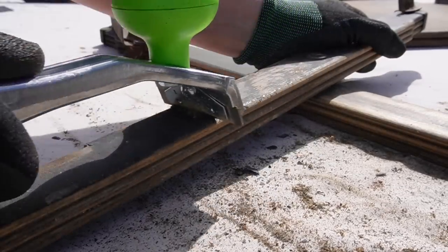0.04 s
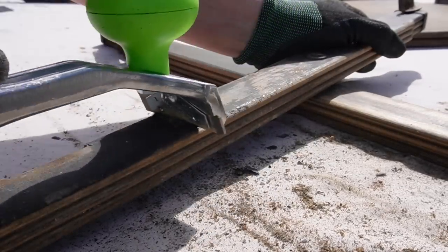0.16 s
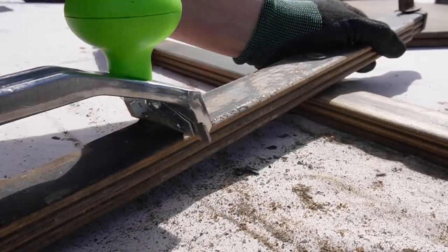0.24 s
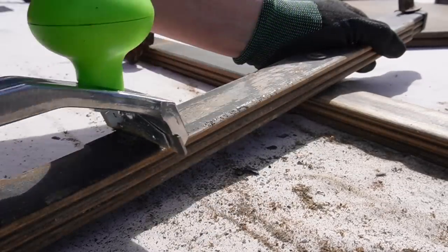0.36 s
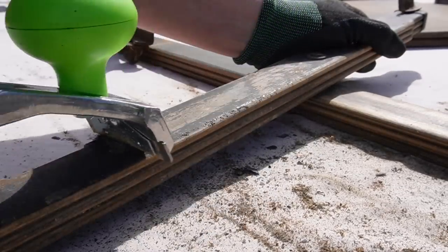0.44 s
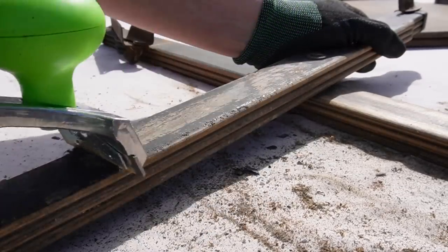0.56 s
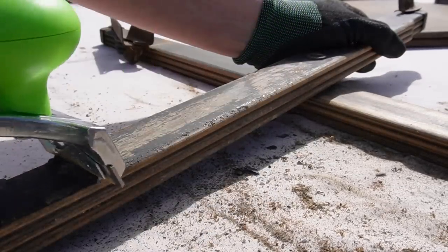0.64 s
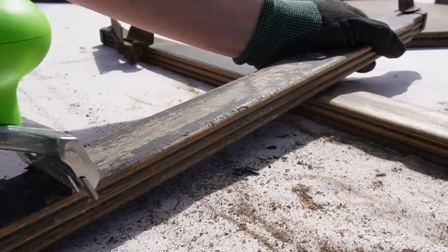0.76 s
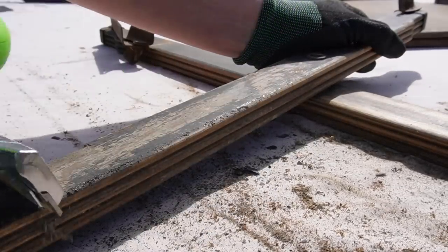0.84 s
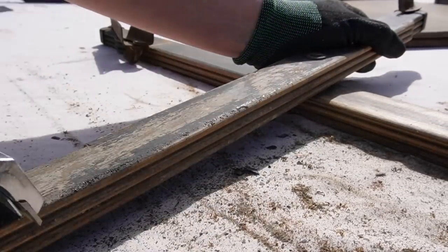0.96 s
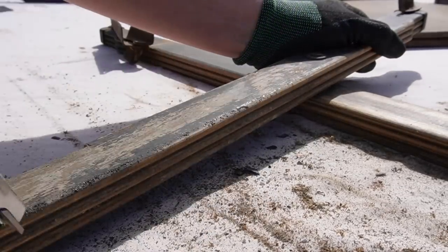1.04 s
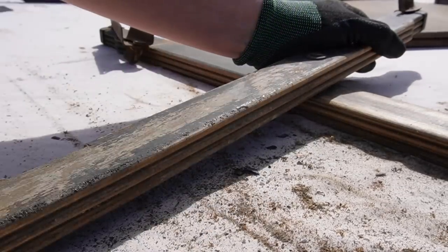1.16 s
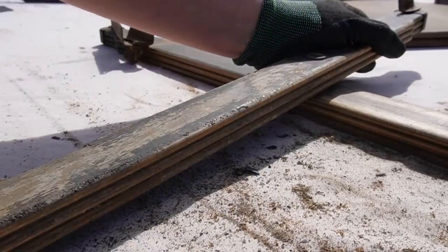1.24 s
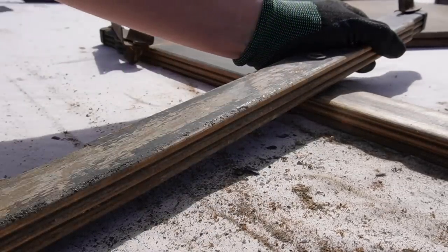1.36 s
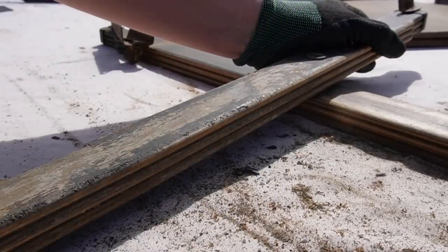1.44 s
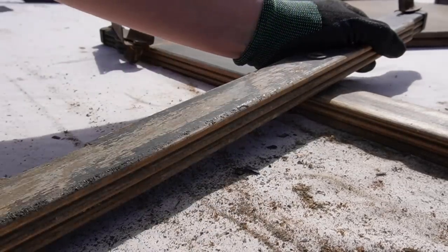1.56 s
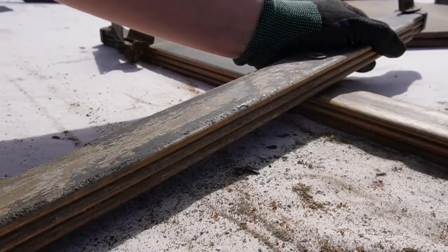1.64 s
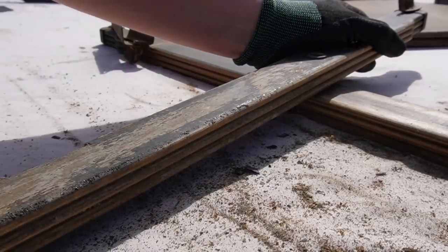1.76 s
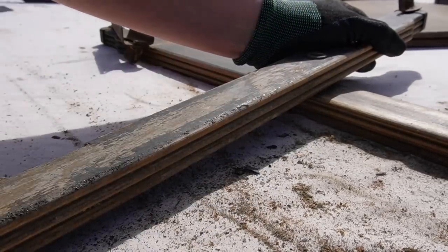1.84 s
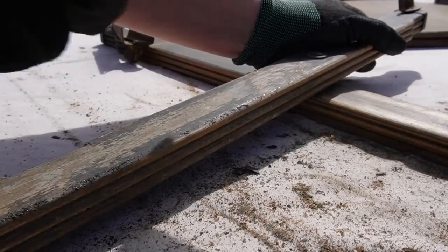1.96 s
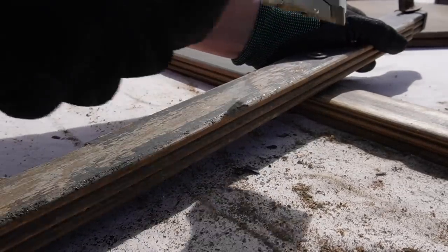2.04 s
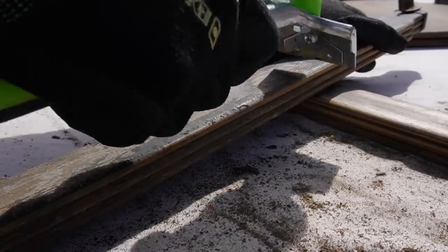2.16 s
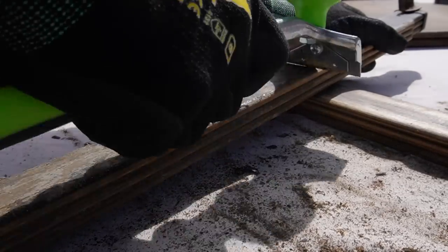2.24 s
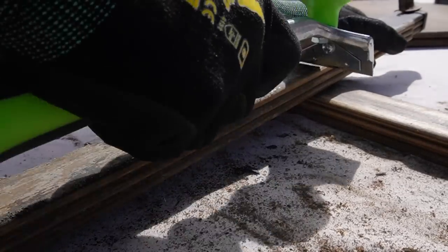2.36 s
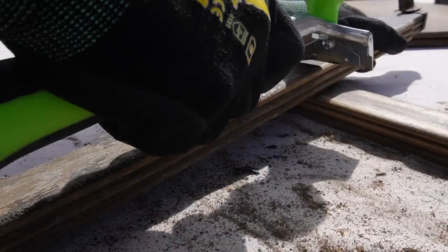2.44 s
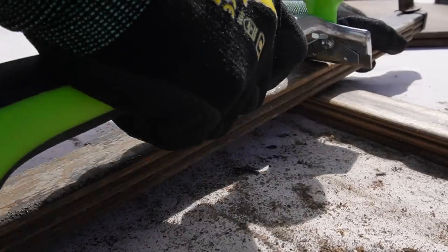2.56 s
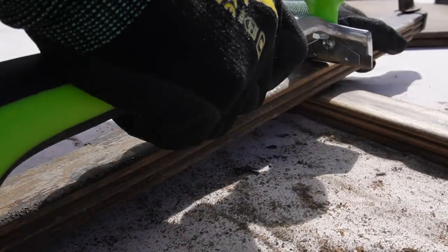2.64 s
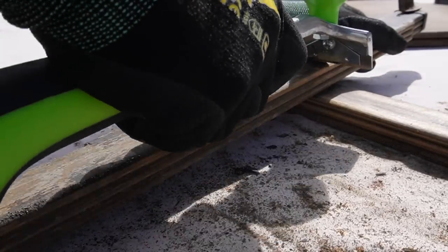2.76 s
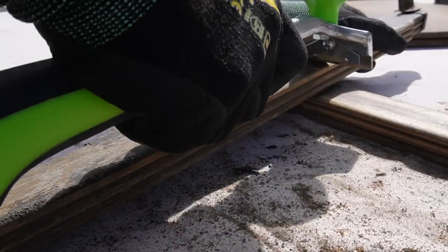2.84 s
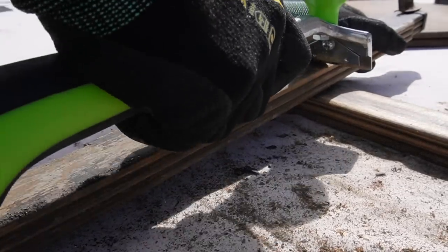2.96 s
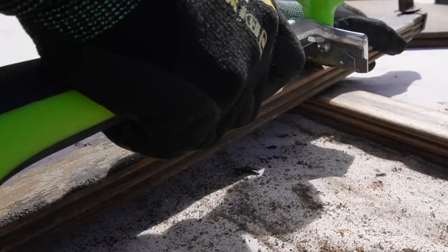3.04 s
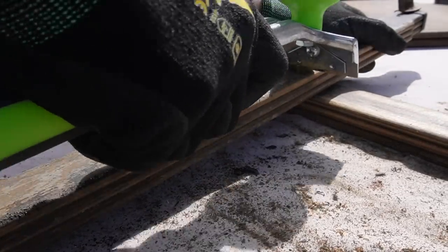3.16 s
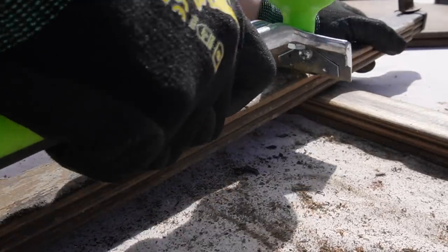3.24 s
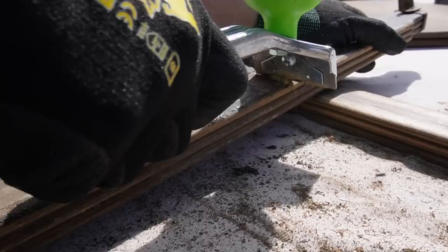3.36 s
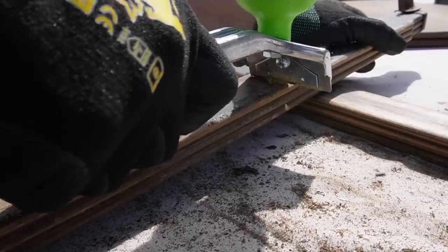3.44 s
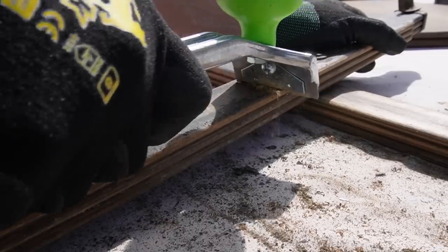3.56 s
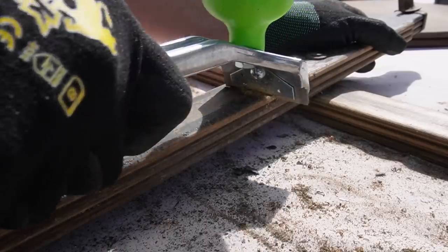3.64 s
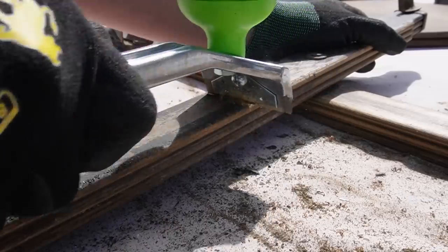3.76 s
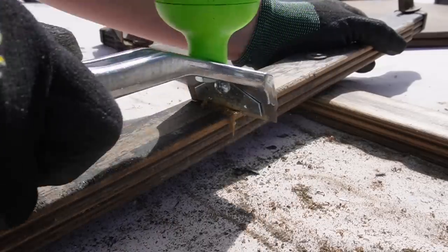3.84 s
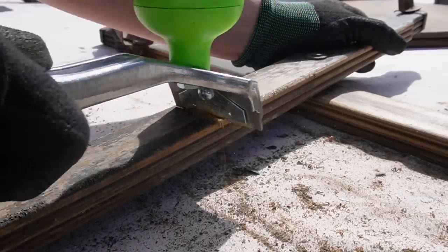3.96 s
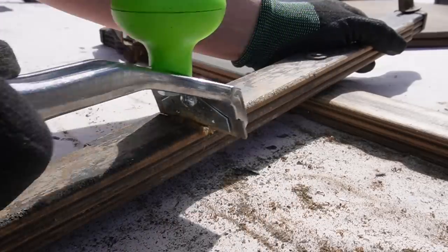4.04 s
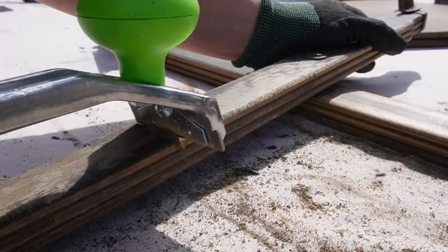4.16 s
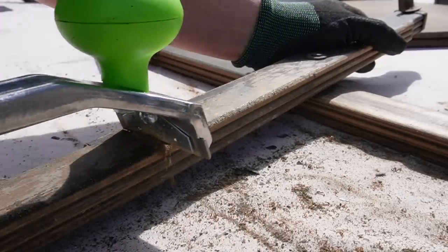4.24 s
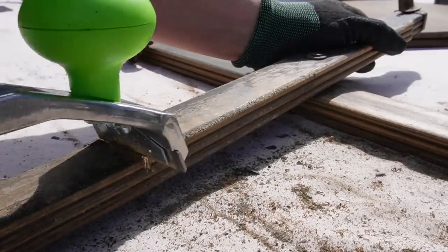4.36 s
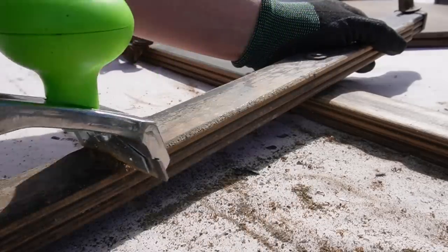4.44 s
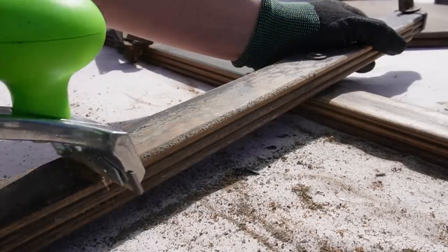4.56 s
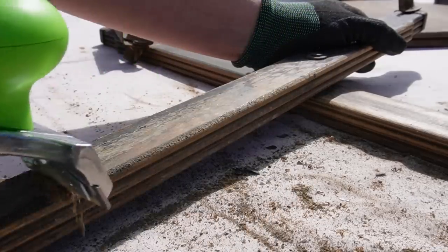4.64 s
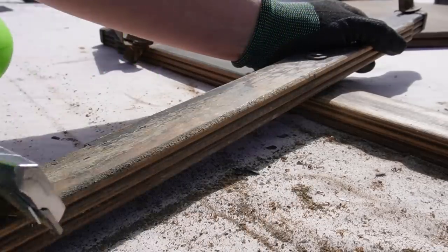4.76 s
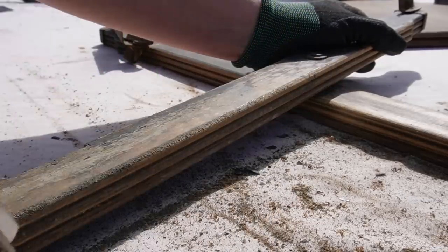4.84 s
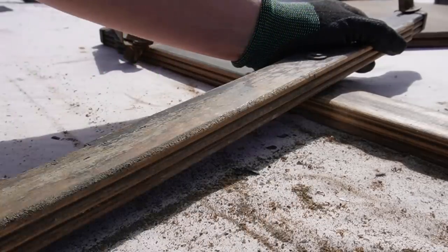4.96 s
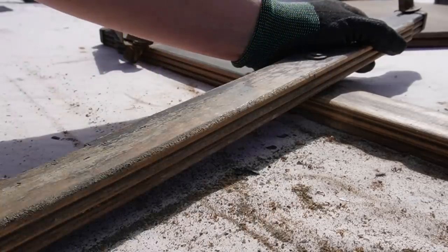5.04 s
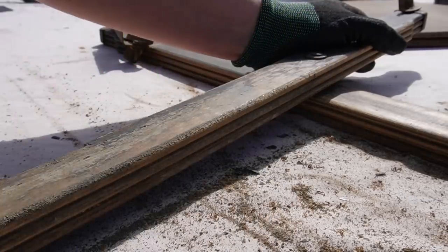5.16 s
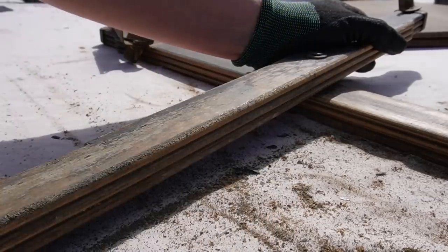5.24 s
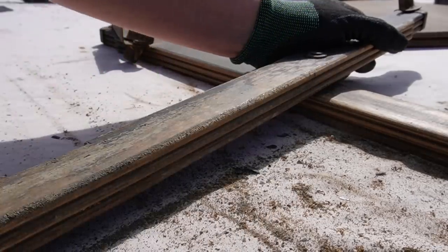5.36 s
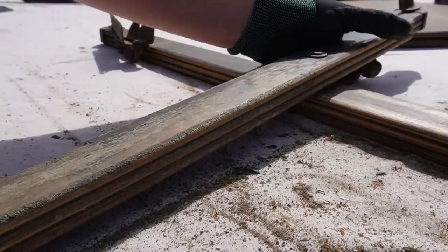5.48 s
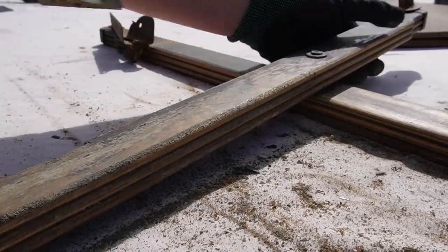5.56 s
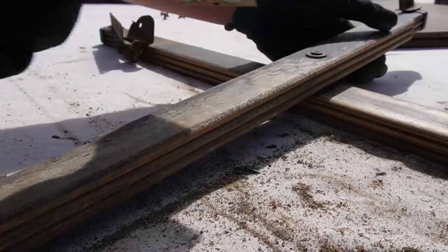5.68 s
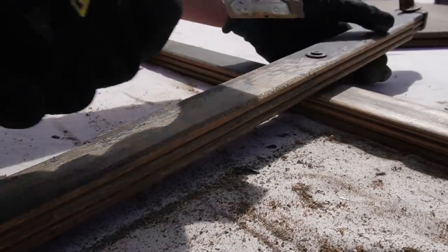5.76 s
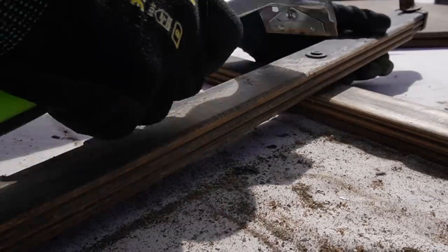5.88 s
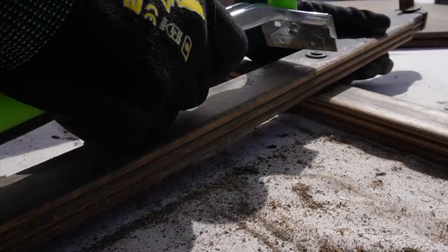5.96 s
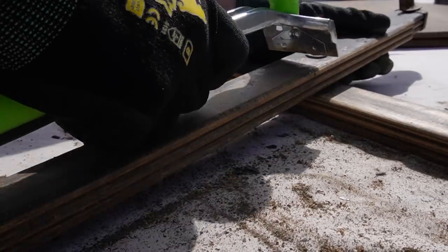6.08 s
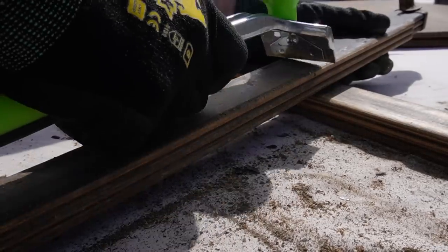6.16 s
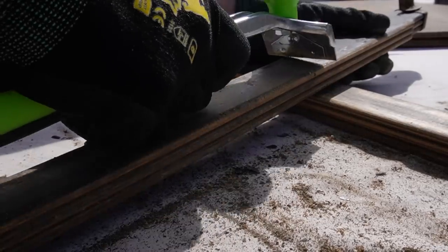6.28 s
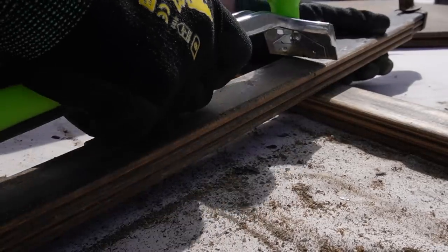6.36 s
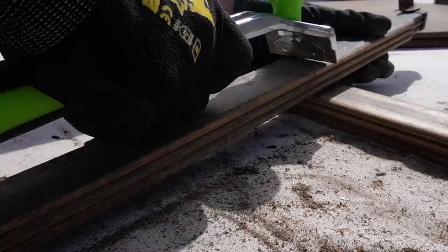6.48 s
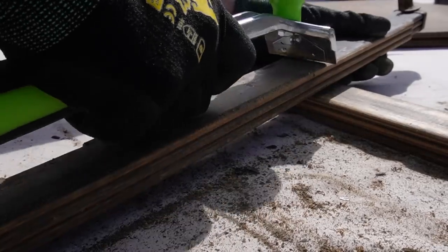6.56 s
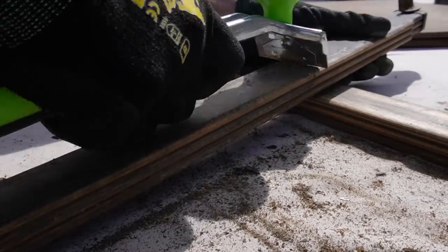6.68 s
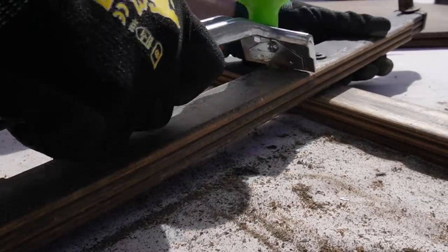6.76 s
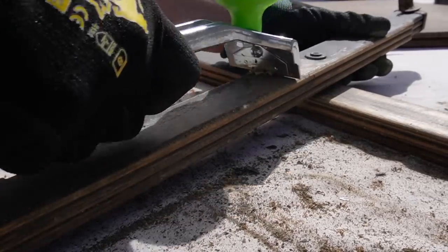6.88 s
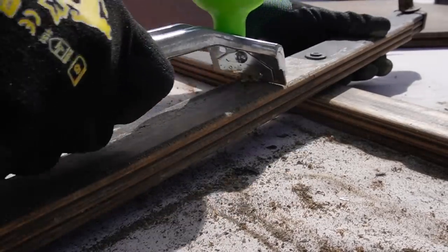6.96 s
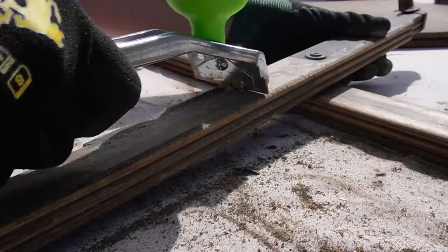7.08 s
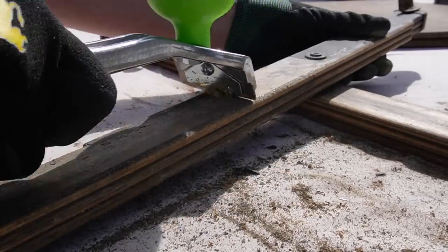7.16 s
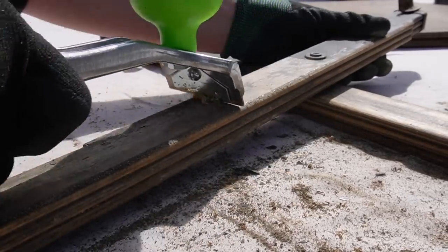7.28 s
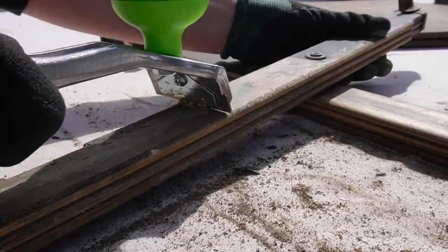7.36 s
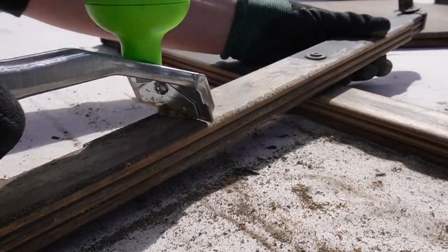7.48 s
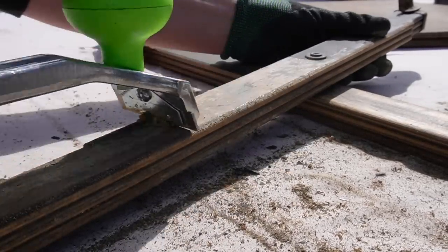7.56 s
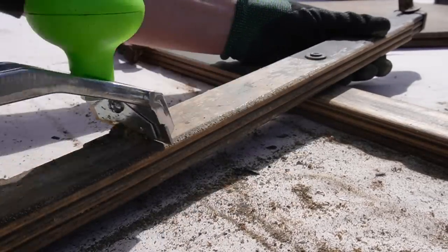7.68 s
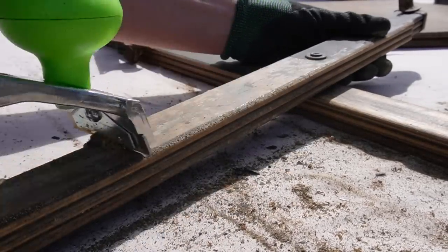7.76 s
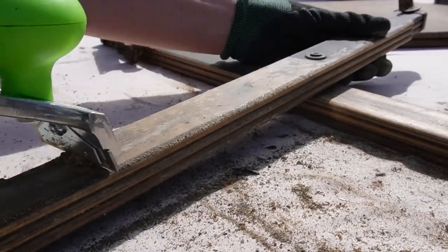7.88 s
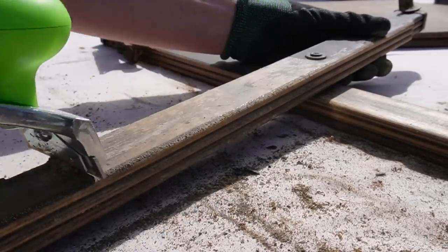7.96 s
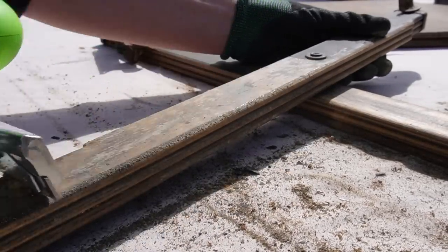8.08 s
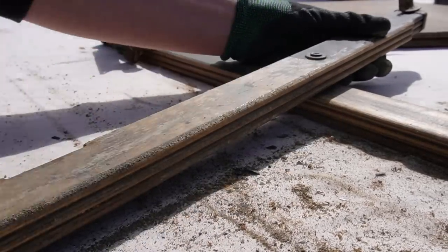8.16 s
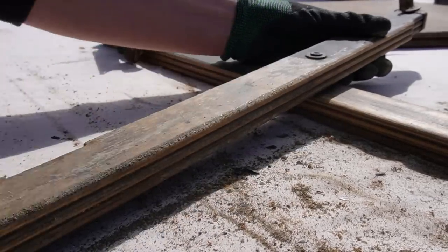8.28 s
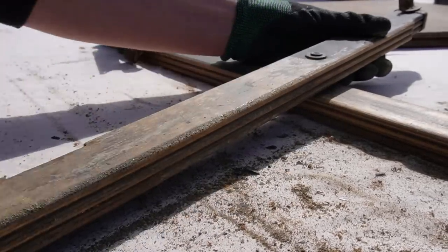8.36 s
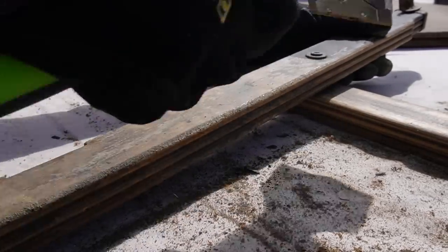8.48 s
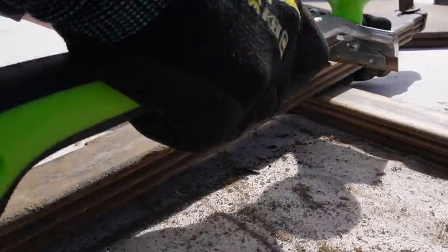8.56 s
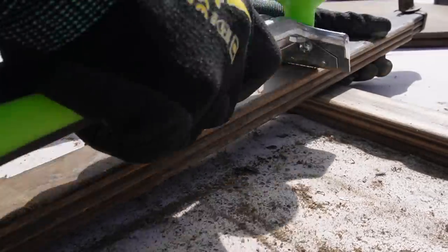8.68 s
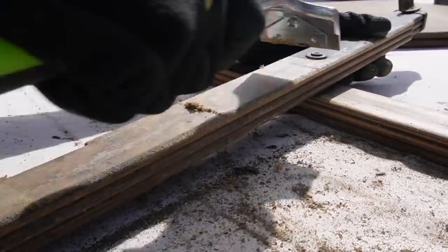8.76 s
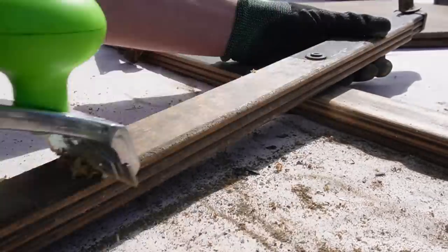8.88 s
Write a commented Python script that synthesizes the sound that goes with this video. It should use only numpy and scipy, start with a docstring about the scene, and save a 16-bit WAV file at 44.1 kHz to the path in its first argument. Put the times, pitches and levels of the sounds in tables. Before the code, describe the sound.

Close, dry, crackling scrapes of a metal blade on painted wood, tool set down with knocks, distant twittering, ending in sped-up, high-pitched clatter.

```python
"""Out of doors, a steel scraper is dragged three times along a painted plywood strip.
Crumbs of paint breaking under the edge are random clicks; they shake resonances of board, blade and holder.
In between the tool is set down with knocks, made of a noise crack and dying tones, and shuffled into place.
Far birds, gliding bands of noise, twitter in the pauses over an outdoor hush of coloured noise.
At the end scraping, knocks and hush run in fast-forward, short and pitched up, over a faint rising sine whine."""
import sys
import numpy as np
from scipy import signal
from scipy.fft import rfft, irfft, next_fast_len
from scipy.io import wavfile
from scipy.ndimage import uniform_filter1d

SR = 44100
rng = np.random.default_rng(int(sys.argv[2]) if len(sys.argv) > 2 else 0)


def dump(signal):
    """Clip the signal to [-1, 1] and save it as 16-bit WAV at the path in sys.argv[1]."""
    limited = np.clip(np.atleast_2d(signal).T, -1, 1)
    pcm = np.round(limited * 32767).astype(np.int16)
    wavfile.write(sys.argv[1], SR, pcm)


def to_linear_factor(level_db):
    """Convert decibel levels (scalar or array-like) to linear amplitude factors."""
    exponent = np.asarray(level_db, float) / 20
    return 10 ** exponent


N = 393372  # length in samples

# What rings under the edge. Each pull has its own grip, because hand and place on the strip change.
# deep board modes: pitch_hz, width_hz, grip1_db, grip2_db, grip3_db
BOARD_BASS_MODES = [(106, 8.3, -11.5, -10, 1), (184, 100, -13, -5, -9), (250, 74, -2.5, -6, -6),
                    (358, 34, 0, 4.5, -7), (465, 71, 1.5, 5, 3)]
# higher board modes: pitch_hz, width_hz, grip1_db, grip2_db, grip3_db
BOARD_MODES = [(620, 27.4, -0.5, -1, -3.5), (800, 124, -4, -8, -15), (1050, 200, -12.5, -7, -8),
               (1250, 130, -8.5, -8, -5), (1404, 186, -1.5, -0.5, 0), (1747, 350, -6.5, -5, -5)]
# lower blade modes: pitch_hz, width_hz, grip1_db, grip2_db, grip3_db
LOWER_BLADE_MODES = [(2050, 380, 0, -3.5, -1), (2350, 61, 1, -6, -8), (2500, 290, 0, 3, 3.5)]
# middle blade modes: pitch_hz, width_hz, grip1_db, grip2_db, grip3_db
BLADE_MODES = [(2815, 240, -3, 1, 4), (2916, 280, -0.5, -9, 1.5), (3010, 93, -12, 2, -9),
               (3348, 130, -1, 0, 5)]
# upper blade modes: pitch_hz, width_hz, grip1_db, grip2_db, grip3_db
UPPER_BLADE_MODES = [(3480, 94, -0.5, -8, -0.49), (3900, 550, 0, 3, 2.5), (4250, 120, -3.5, -1.5, -1)]
# modes of the holder: pitch_hz, width_hz, grip1_db, grip2_db, grip3_db
HOLDER_MODES = [(4750, 216, -4.5, -0.5, -6), (5260, 520, -7, -11, -14), (5737, 340, -0.5, 1.5, -1),
                (6010, 290, -8.5, -1.5, -1), (6580, 450, -8.5, -2.5, -6.5)]
# modes of the edge: pitch_hz, width_hz, grip1_db, grip2_db, grip3_db
EDGE_MODES = [(7410, 350, 7.5, 3, 3), (8070, 1600, -0.5, 1, -1), (9000, 370, 2, 2, -11.5),
              (9520, 430, 2.5, -0.5, 2.5), (10400, 940, 3, 5.5, -4.5)]
# top hiss: pitch_hz, width_hz, grip1_db, grip2_db, grip3_db
TOP_MODES = [(11950, 470, -8, -5, -3), (12320, 120, 0, 0, -7), (13200, 220, -1, -6, 1),
             (13700, 170, -10, -10, -9), (14400, 170, -1, -10, -21), (15100, 160, -3, -8, -4)]
PARTS = (BOARD_BASS_MODES, BOARD_MODES, LOWER_BLADE_MODES, BLADE_MODES,
         UPPER_BLADE_MODES, HOLDER_MODES, EDGE_MODES, TOP_MODES)

# long pulls, one list each: time_s, scraping_db, top_hiss_db (over the scraping level)
PULLS = [
    [(0.0, -32, -15), (0.188, -31, -14), (0.248, -34.5, -12), (0.29, -30, -18), (0.502, -33.5, -20),
     (0.554, -31, -16), (0.71, -31.5, -23), (0.772, -37, -28), (0.852, -37, -27), (0.888, -30.5, -27),
     (0.926, -30, -27), (1.002, -38.5, -30), (1.03, -55.5, -27), (1.072, -40, -33), (1.44, -29, -27),
     (1.5, -40, -33), (1.534, -38, -36), (1.638, -32.5, -30), (1.666, -40, -31), (1.69, -56, -28)],
    [(3.06, -57, -14), (3.07, -48, -12), (3.13, -37, -9), (3.27, -39, -14.5), (3.44, -31, -11),
     (3.5, -42.5, -15), (3.53, -33, -12.5), (3.86, -34, -13.5), (3.89, -30, -11), (4.02, -38, -19),
     (4.08, -29, -15.5), (4.39, -34, -21), (4.44, -29, -25), (4.61, -35, -30), (4.7, -28, -26),
     (4.85, -32, -36), (5.08, -33, -25), (5.25, -32.5, -31), (5.32, -28.5, -23), (5.38, -63.5, -27)],
    [(6.67, -62, -20), (6.712, -37.5, -14), (6.814, -36, -21), (6.85, -35.5, -12), (6.91, -36, -20),
     (7.046, -35.5, -9), (7.098, -31.5, -18), (7.146, -34.5, -20), (7.218, -31, -18), (7.326, -37, -21),
     (7.394, -30.5, -19), (7.526, -32, -21), (7.732, -28.5, -24), (7.798, -33, -25), (7.84, -30.5, -18),
     (7.918, -30, -24), (7.974, -35.5, -26), (8.038, -36, -28), (8.184, -30, -25), (8.21, -39, -1)],
]
# each part's share over the scraping level, a list per grip, a row per part but the top hiss:
# start_db, middle_db, end_db (place in the pull)
PART_SHARES = [
    [(-19.5, -19.5, -25), (-10, -8, -13), (-11, -8, -8), (-2.5, -6, -6.5), (-13, -10, -10), (-9, -7, -10),
     (-19, -17.5, -22)],
    [(-31, -19.5, -24), (-9.5, -5, -13.5), (-9, -5.5, -7.5), (-4.5, -7.5, -4.5), (-8.5, -15, -9),
     (-7.5, -9.5, -8.5), (-18, -20.5, -21)],
    [(-32.5, -21.5, -20.5), (-15, -6.5, -8.5), (-7.5, -10, -6), (-9.5, -6, -8), (-8, -11, -9),
     (-4, -7.5, -7), (-12.5, -17.5, -17.5)],
]
# share gained for each dB above the usual level, by part but the top hiss: gain_db_per_db
FOLLOW_LEVEL = [-0.88, -0.39, 0.067, 0.12, 0.075, 0.16, 0.39]
USUAL_DB, PULL_CRUMBS_PER_S = -34.5, 18000
# one resonance sings out at some places on the strip:
# start_s, length_s, start_hz, end_hz, level_db (over the scraping level)
SINGING = [(0, 0.48, 2980, 2870, -9), (0.24, 0.26, 3450, 3800, -12), (1.26, 0.83, 2600, 2500, -6),
           (1.25, .4, 3570, 3500, -9), (3.1, 0.5, 2870, 2600, -8), (3.3, 0.24, 5800, 5850, -9),
           (3.757, 0.32, 5750, 5640, -8), (3.997, 0.47, 620, 620, -14.5), (4.045, 0.7, 2400, 2170, -11.5),
           (4.514, 0.58, 1406, 1520, -6.5), (4.51, 0.28, 5650, 5650, -12), (4.98, 0.55, 2620, 2670, -11),
           (4.973, 0.36, 3360, 3440, -6), (6.706, 0.61, 5600, 5800, -9.5), (7.3, .55, 2820, 3000, -6.5),
           (7.298, 1, 1340, 1400, -17), (7.763, 0.85, 2070, 2050, -10.5)]
SINGING_WIDTH = 0.029  # width over pitch

# outdoor hush: pitch_hz, level_db (per Hz)
AIR_COLOUR = [(15, -40), (25, -13), (96, -0.5), (148, -6), (198, 0.5), (322, -7.5), (762, -12.5),
              (848, -10), (2230, -16), (3090, -11.5), (6380, -26), (13500, -45), (15500, -47)]
# the hush in fast-forward, thin and bright: pitch_hz, level_db (per Hz)
FAST_AIR_COLOUR = [(40, -43), (270, -17), (450, -5.5), (830, -5), (1200, -6), (3000, -12.5), (5000, -15.5),
                   (15800, -20)]
AIR_DB, FAST_AIR_DB = -70, -59.5
FAST_START_S = 8.2  # hush and port balance turn to fast-forward

# bird notes: start_s, end_s, start_hz, end_hz, level_db, blur_hz
BIRD_NOTES = [(1.685, 1.957, 2430, 2420, -63, 450), (1.723, 1.88, 4270, 4200, -59, 700),
              (2.003, 2.08, 4940, 4600, -65, 250), (2.048, 2.083, 4100, 3040, -61, 150),
              (2.072, 2.195, 2970, 2876, -62, 30), (2.119, 2.175, 2900, 1500, -67, 250),
              (2.087, 2.218, 4360, 4020, -68, 500), (2.271, 2.36, 4330, 4050, -68.5, 394),
              (5.37, 5.595, 2370, 2380, -64.5, 300), (5.553, 5.61, 5200, 4500, -84, 200),
              (5.662, 5.78, 4510, 3900, -72, 500), (5.767, 5.89, 4200, 4000, -66, 150),
              (5.942, 6.018, 4800, 4500, -68, 200), (5.961, 6.037, 4170, 4000, -63.5, 200),
              (6.02, 6.077, 4500, 4170, -63, 200), (6.052, 6.146, 4780, 4750, -66, 60),
              (6.054, 6.174, 4130, 3270, -60, 200), (6.11, 6.242, 2990, 2940, -67, 40),
              (6.143, 6.197, 3000, 2400, -71, 200), (6.213, 6.26, 5230, 5100, -71, 200),
              (6.256, 6.335, 4600, 4500, -60, 150), (6.309, 6.41, 4250, 3900, -65.5, 150),
              (6.477, 6.55, 4200, 3800, -63, 200), (6.561, 6.693, 4200, 4000, -70, 250)]
# blurred flock and rustle: start_s, length_s, start_db, end_db
CHATTER_BURSTS = [(1.671, 0.33, -53.5, -69), (1.939, 0.085, -60, -71), (2.017, 0.24, -63, -66),
                  (2.258, .08, -81, -77), (5.358, 0.28, -57.5, -71.5), (5.704, 0.23, -69, -66),
                  (5.916, 0.31, -74, -83), (6.266, 0.23, -65, -72), (6.484, 0.16, -64, -71)]
# colour of that flock: pitch_hz, level_db (per Hz)
FLOCK_COLOUR = [(500, -14), (1300, -15.5), (2250, -8), (3200, -11), (4200, -3.5), (4900, -10.5),
                (5800, -17), (8000, -25), (12000, -33)]

# the tool set down: time_s, peak_db, thud_db, blade_ring_db (over the peak), brightness_db (per octave)
SET_DOWNS = [(2.342, -20, -10, -47, 0.5), (2.351, -25.5, -4, -34, 6), (2.634, -24.5, -5.5, -47, -4.5),
             (2.64, -33, -3, -33, -3), (2.745, -37, -9, -60, -2), (2.976, -52, -18, -41, 7),
             (3.014, -47, -15, -40, 5.5), (3.039, -47, -6, -43, 10), (3.073, -39, -13, -39, 11),
             (6.247, -29, -4.5, -42, -2), (6.252, -21.5, -13, -46, 12), (6.328, -52, -9, -40, 4),
             (6.419, -45, 0, -40, 12), (6.539, -26, -13, -54, 20), (6.689, -47, -14, -60, 7),
             (6.627, -36, -21, -62, 0), (6.633, -38, -16, -62, -4)]
# knocks in fast-forward, pitched up: time_s, peak_db, thud_db, brightness_db (per octave)
FAST_KNOCKS = [(8.313, -28, -9, -3), (8.407, -22, -0.5, 4), (8.499, -23, -7, 0.5),
               (8.596, -29.5, -13, -0.5), (8.688, -25, -18, 2), (8.694, -29, -20, 13),
               (8.716, -25, -24, 10), (8.76, -21, -5, 2), (8.86, -18, -7.5, 0.5), (8.893, -26, -11, 14)]
# the strip when struck, before each knock shifts it: pitch_hz, level_db, t60_s
WOOD_MODES = [(236, -15.5, 0.14), (319, -17.5, 0.11), (427, -17.5, 0.068), (615, -15, 0.11),
              (847, -2, 0.023), (1229, -18, 0.057), (1770, 1.5, 0.024)]
# the free blade, its level varied at each knock: pitch_hz, level_db, t60_s
STEEL_MODES = [(5200, -2, 0.19), (6830, 1.5, 0.12), (9660, -1, .15), (11400, -4, 0.22)]
# low modes of the knocks in fast-forward, before each knock shifts them: pitch_hz, level_db, t60_s
FAST_KNOCK_MODES = [(700, -10.5, 0.026), (1500, -10, 0.019), (2000, -14, 0.028)]
# first contact of a set-down: pitch_hz, level_db
CRACK_COLOUR = [(300, -19), (1000, -6), (1800, 0), (2600, -3), (3400, 1.5), (4300, 0.5), (5200, -17),
                (7000, -28), (12000, -39), (16000, -44)]
# first contact of the knocks in fast-forward, also the colour of snapping crumbs: pitch_hz, level_db
SNAP_COLOUR = [(300, -28), (1000, -14), (2000, 5.5), (4000, 3), (8000, 4.5), (13000, 2.5), (16000, -4)]

# the edge shuffled into place, a few crumbs at a time: start_s, length_s, start_db, end_db
SHUFFLE_SLIDES = [(2.974, 0.092, -78, -54), (6.257, .05, -62, -68), (6.312, 0.029, -62, -53),
                  (6.411, 0.077, -56.5, -60), (6.529, .012, -59, -56), (6.626, .012, -50, -52),
                  (6.64, 0.043, -65, -65)]
# each part's share in a shuffle, in the order of PARTS: level_db
SHUFFLE_PART_DB = [-14, -6.5, -11, -10, -6, -7.5, -10.5, -13]
SHUFFLE_CRUMBS_PER_S = 2500
TICKS_DB, TICKS_PER_S = -7, 180  # single bright crumbs snapping off; level before colouring

# scraping in fast-forward: start_s, length_s, start_db, end_db, body_db (below 6 kHz, over the treble)
FAST_SCRAPES = [(8.195, 0.086, -30, -37, -7), (8.323, 0.05, -35, -28, -7), (8.41, 0.068, -32.5, -34, -6.5),
                (8.498, 0.021, -37, -36, -8.5), (8.616, .016, -50, -52, -2),
                (8.657, 0.0734, -39, -35.5, -11), (8.765, 0.064, -39.5, -29.5, -8.5),
                (8.865, 0.032, -39, -33, -10.5), (8.888, .05, -25.5, -28, -11.5)]
# its broad colour: pitch_hz, level_db (per Hz)
FAST_SCRAPE_COLOUR = [(35, -40), (60, -12.5), (698, -14.5), (2000, -7), (2140, -8), (2350, -8),
                      (3760, -4.5), (4320, -6), (4860, -15), (5330, -3), (6900, 1), (11500, 9.5),
                      (13300, 2.5), (14900, 12.5), (15700, 1), (16300, -29)]
# the tool's peaks in it, varied at each scrape: pitch_hz, width_hz, level_db
FAST_TOOL_PEAKS = [(4900, 140, 2.5), (11200, 220, -5), (11900, 31, 12), (12600, 36, 7), (12900, 29, 8),
                   (13300, 50, -7), (13800, 150, 2), (14100, 140, -12)]

# rising whine: time_s, pitch_hz, level_db
WHINE_PATH = [(8.4, 400, -83), (8.46, 399.5, -63), (8.7, 430.5, -63.5), (8.85, 474, -72), (8.92, 520, -66)]

# left port over right for the near sounds: pitch_hz, level_db
LEFT_OVER_RIGHT = [(60, -2), (380, -0.5), (700, 0), (2400, -0.5), (4400, 4.5), (8000, 1.5), (15000, 2)]
# unlike part of the two ports: pitch_hz, level_db
UNLIKE_COLOUR = [(30, 0), (80, -41), (300, -18.5), (700, -16.5), (1500, -21.5), (2800, -21), (5500, -15),
                 (9000, -11.5), (14000, -6)]
# how the ports differ with the tool far, close by, and in fast-forward:
# offset_share (of the left-right difference), unlike_low_db (below 7 kHz), unlike_high_db (above)
FAR_PORTS = (0.86, -4.5, -12)
NEAR_PORTS = (1, 2.1, 7.4)
FAST_PORTS = (0.12, -4, -9)
# middle of the approach in each pull: time_s
PASS_TIMES = [.5, 4.35, 7.71]
PASS_S = 0.23  # how fast the tool comes close
KNOCK_LEAN_LEFT = -0.04  # negative share leans right: the knocks fall at the far end of the strip
# each port's own noise: pitch_hz, level_db (per Hz)
HISS_COLOUR = [(200, -8), (2000, -1), (9000, -14), (13500, -14), (15000, -26), (16500, -40)]
HISS_DB = -75.5


def evened(x):
    """Scales to rms 1."""
    return x / np.sqrt(np.mean(x ** 2) + 1e-20)


def read(points, hz):
    """Reads a spectrum table on a log-frequency axis."""
    f, value = np.transpose(points)
    return np.interp(np.log(hz + 1), np.log(f + 1), value)


def colour(x, points, share=1):
    """Filters by a dB spectrum, scaled by share."""
    length = x.shape[-1]
    n = next_fast_len(length, True)
    gain = to_linear_factor(share * read(points, np.fft.rfftfreq(n, 1 / SR)))
    return irfft(rfft(x, n) * gain, n)[..., :length]


def add(mix, s, sound):
    """Mixes a sound in at time s."""
    part = mix[round(s * SR):][:len(sound)]
    part += sound[:len(part)]


def ring(x, hz, width):
    """Resonance of gain 1 that can glide: shift down, smooth, shift back."""
    turn = np.exp(2j * np.pi * np.cumsum(hz * np.ones(len(x))) / SR)
    r = np.exp(-np.pi * width / SR)
    return 2 * (turn * signal.lfilter([1 - r], [1, -r], x / turn)).real


def drift(n, per_s):
    """Slow random wander: chance values, per_s of them a second, joined by straight lines."""
    knots = rng.standard_normal(int(n / SR * per_s) + 2)
    return 0.88 * np.interp(np.arange(n) / SR * per_s, np.arange(len(knots)), knots)


def curve(rows):
    """Start time and the columns sample by sample."""
    s, *columns = np.transpose(rows)
    t = np.arange(s[0], s[-1], 1 / SR)
    return s[0], [np.interp(t, s, c) for c in columns]


def ramp(length, db0, db1, rise_s, fall_s):
    """Gain that rises, slides from one level to the other, and falls."""
    t = np.arange(0, length, 1 / SR)
    fade = np.clip(np.minimum(t / rise_s, (length - t) / fall_s), 0, 1) ** 2
    return to_linear_factor(db0 + (db1 - db0) * t / length) * fade


def air():
    """Outdoor hush, partly shared by the two sides; at the end it runs in fast-forward, thin and bright."""
    noise = rng.standard_normal((2, 1, N)) + 0.41 * rng.standard_normal((2, 2, N))
    usual = to_linear_factor(AIR_DB + 1.0 * drift(N, 3)) * evened(colour(noise[0], AIR_COLOUR))
    fast = to_linear_factor(FAST_AIR_DB) * evened(colour(noise[1], FAST_AIR_COLOUR))
    return np.where(np.arange(N) / SR < FAST_START_S, usual, fast)


def grit(n, per_s, spread_db):
    """Paint crumbs breaking under the edge: dense clicks of uneven size that come in clumps."""
    size = to_linear_factor(spread_db * np.minimum(rng.exponential(1, n), 4)) * rng.choice([-1, 1], n)
    breaks = rng.random(n) < per_s / SR
    clumps = to_linear_factor(0.72 * drift(n, 150) + 1.24 * drift(n, 35.35))
    return evened(size * breaks * clumps)


def sings(hz, t):
    """Power of the singing resonances over frequency and time; each swells and fades once."""
    power = 0
    for s, length, hz0, hz1, db in SINGING:
        u = np.clip((t - s) / length, 0, 1)
        centre = hz0 + (hz1 - hz0) * u
        peak = 1 / (1 + ((hz - centre) / (SINGING_WIDTH * centre / 2)) ** 2)
        power = power + to_linear_factor(2 * db) * np.sin(np.pi * u) * peak / peak.mean(0)
    return power


def stroke(s, grip, gain, shares_db, per_s):
    """The grit drives each part; its modes swell, fade and shift as the edge travels along the strip."""
    n = len(gain)
    hz, t, force = signal.stft(grit(n + 4096, per_s, 2.2), SR, nperseg=2048, noverlap=1536)
    hz = hz[:, None]
    at = np.minimum((t * SR).astype(int), n - 1)  # sample at each frame
    power = 1e-14 + sings(hz, s + t)
    for modes, db in zip(PARTS, shares_db):
        part = 0
        for centre_hz, width, *grip_db in modes:
            moved_hz = centre_hz * (1 + 0.0082 * drift(n, 2.58)[at])
            off = (hz - moved_hz) / (width / 2)
            mode_db = grip_db[grip] + 2.9 * drift(n, 6.08)[at]
            part = part + to_linear_factor(2 * mode_db) / (1 + off ** 2) ** 1.214
        # little is radiated outside the modes
        part = part / (1 + (modes[0][0] * 0.78 / (hz + 1)) ** 6)
        part = part / (1 + (hz / (modes[-1][0] * 1.04)) ** 8)
        power = power + to_linear_factor(2 * db[at]) * part / part.mean(0)
    # many weak modes come and go
    ridges = uniform_filter1d(rng.standard_normal(force.shape), 4, 0)
    ridges = evened(uniform_filter1d(ridges, 30, 1))
    shaken = force * np.sqrt(power) * to_linear_factor(2.6 * ridges)
    return gain * signal.istft(shaken, SR, nperseg=2048, noverlap=1536)[1][:n]


def pull(grip, rows):
    """A long pull: each part's share bends smoothly with the place on the strip and leans with the level."""
    s, (db, top_db) = curve(rows)
    u = np.linspace(-1, 1, len(db))  # place in the pull
    shares_db = []
    for (first, middle, last), follow in zip(PART_SHARES[grip], FOLLOW_LEVEL):
        bend = first * u * (u - 1) / 2 + middle * (1 - u ** 2) + last * u * (u + 1) / 2
        shares_db.append(bend + follow * (db - USUAL_DB))
    gain = to_linear_factor(db) * signal.windows.tukey(len(db), 600 / len(db))
    return s, stroke(s, grip, gain, [*shares_db, top_db], PULL_CRUMBS_PER_S)


def birds():
    """Far warbling notes, noise in gliding bands blurred by distance and echoes, over the mush of the flock."""
    out = np.zeros((2, N))
    for s0, s1, hz0, hz1, db, blur in BIRD_NOTES:
        hz = np.linspace(hz0, hz1, round((s1 - s0) * SR))
        hz = hz + 0.15 * blur * drift(14000, 36)[:len(hz)]
        shared, *own = rng.standard_normal((3, 14000))[:, :len(hz)]
        for side in (0, 1):
            note = ring(ring(shared + 0.5 * own[side], hz, blur), hz, 3 * blur)
            add(out[side], s0, to_linear_factor(db) * evened(note) * signal.windows.tukey(len(hz), 0.4))
    for s, *shape in CHATTER_BURSTS:
        gain = ramp(*shape, 0.029, 0.034)
        flutter = to_linear_factor(2.8 * drift(16000, 26))
        noise = rng.standard_normal(16000) + 0.89 * rng.standard_normal((2, 16000))
        mush = flutter * colour(noise, FLOCK_COLOUR)
        for side in (0, 1):
            add(out[side], s, gain * evened(mush[side])[:len(gain)])
    return out


def struck(modes, crack, crack_t60, top_hz, thud_db, bright_db):
    """A short wide crack, brighter up to top_hz for a hard contact, then the low modes die away; peak 1."""
    t, chance = np.arange(9000) / SR, rng.random((len(modes), 2))
    thud = 0
    for (hz, db, t60), (a, b) in zip(modes, chance):
        shifted_hz = hz * (0.927 + 0.18 * a)
        thud = thud + to_linear_factor(db - 60 * t / t60) * np.sin(2 * np.pi * shifted_hz * t + b)
    tilted = [(hz, db + bright_db * np.log2(min(hz, top_hz) / 2500)) for hz, db in crack]
    snap = evened(colour(rng.standard_normal(len(t)), tilted)) * to_linear_factor(-60 * t / crack_t60)
    thud = thud * (1 - np.exp(-t / 0.001))  # the modes take a moment to build
    hit = (snap + to_linear_factor(thud_db) * thud) * np.minimum(t / 0.00088, 1)
    return hit / abs(hit).max()


def knocks():
    """The tool lands: wood knock, rattling tail, ringing blade; then knocks in fast-forward, pitched up."""
    out, t = np.zeros(N), np.arange(12000) / SR
    for s, db, thud_db, ring_db, bright_db in SET_DOWNS:
        add(out, s, to_linear_factor(db) * struck(WOOD_MODES, CRACK_COLOUR, 0.017, 3200, thud_db, bright_db))
        blade = 0
        for hz, mode_db, t60 in STEEL_MODES:
            varied_db = mode_db + 3 * rng.standard_normal()
            blade = blade + to_linear_factor(varied_db - 60 * t / t60) * np.sin(2 * np.pi * hz * t)
        add(out, s, to_linear_factor(db + ring_db) * blade)
        rattle = evened(colour(rng.standard_normal(len(t)), CRACK_COLOUR))
        add(out, s, to_linear_factor(db - 33.5 - 60 * t / 0.2) * rattle)
    for s, db, thud_db, bright_db in FAST_KNOCKS:
        add(out, s, to_linear_factor(db) * struck(FAST_KNOCK_MODES, SNAP_COLOUR, 0.0086, 16000, thud_db, bright_db))
    return out


def shuffle(s, length, db0, db1):
    """A small slide of the edge between pulls: sparse grit shakes the parts, and bright crumbs snap off."""
    gain = ramp(length, db0, db1, 0.0045, 0.0064)
    shares_db = np.outer(SHUFFLE_PART_DB, np.ones(len(gain)))
    slide = stroke(s, 2, gain, shares_db, SHUFFLE_CRUMBS_PER_S)  # grip 3, counted from 0
    ticks = colour(grit(4096, TICKS_PER_S, 3), SNAP_COLOUR)[:len(gain)]
    return s, slide + gain * to_linear_factor(TICKS_DB) * ticks


def fast_scrape(s, length, db0, db1, body_db):
    """Scraping in fast-forward: pitched-up, jerky grit, mostly treble, with a new mix of peaks each time."""
    gain = ramp(length, db0, db1, 0.0054, 0.0097)
    force = grit(8192, 20000, 2.4) * to_linear_factor(2.8 * drift(8192, 161))
    peaks = 0
    for hz, width, db in FAST_TOOL_PEAKS:
        peaks = peaks + to_linear_factor(db + 0.97 * rng.standard_normal()) * ring(force, hz, width)
    sound = evened(colour(force, FAST_SCRAPE_COLOUR)) + 0.22 * evened(peaks)
    patches = rng.standard_normal(24)  # broad humps that differ from scrape to scrape
    sound = colour(sound, np.c_[np.linspace(300, 16000, len(patches)), 3 * patches])
    body = signal.sosfiltfilt(signal.butter(4, 6000, fs=SR, output="sos"), sound)
    balanced = evened(sound - body) + to_linear_factor(body_db) * evened(body)
    return s, gain * balanced[:len(gain)]


def whine():
    """A faint rising tone, as of a far engine, with a weak octave and a weak tone at 1.6 times its pitch."""
    s, (hz, db) = curve(WHINE_PATH)
    turns, out = 2 * np.pi * np.cumsum(hz) / SR, np.zeros(N)
    tone = np.sin(turns) + to_linear_factor(-9) * np.sin(2 * turns) + to_linear_factor(-9) * np.sin(1.6 * turns)
    add(out, s, np.sqrt(2) * to_linear_factor(db) * tone)
    return out


def two_ports(near, hits):
    """Near sounds reach two close ports almost alike; ground reflections add a small unlike part."""
    t = np.arange(N) / SR
    close = 0  # 0 far to 1 close by, back to 0 as each pull ends
    for s, rows in zip(PASS_TIMES, PULLS):
        close = close + (t < rows[-1][0]) * (1 + np.tanh((t - s) / PASS_S)) / 2
    share, low_db, high_db = (np.where(t < FAST_START_S, far + (by - far) * close, fast)
                              for far, by, fast in zip(FAR_PORTS, NEAR_PORTS, FAST_PORTS))
    echoes = rfft(rng.standard_normal(1024) * to_linear_factor(-60 * np.arange(1024) / SR / 0.011))
    scramble = irfft(echoes / abs(echoes))  # scrambles the phase only
    unlike = colour(signal.oaconvolve(near + hits, scramble)[:N], UNLIKE_COLOUR)
    low = signal.sosfiltfilt(signal.butter(4, 7000, fs=SR, output="sos"), unlike)
    offset = (colour(near, LEFT_OVER_RIGHT, 0.5) - colour(near, LEFT_OVER_RIGHT, -0.5)) / 2
    side = share * offset + KNOCK_LEAN_LEFT * hits
    side = side + to_linear_factor(low_db) * low + to_linear_factor(high_db) * (unlike - low)
    return near + hits + np.array([side, -side])


def scene():
    """Sums the tool's sounds and the whine at the two ports, then adds the birds and the hush."""
    near, hits = whine(), knocks()
    for grip, rows in enumerate(PULLS):
        add(near, *pull(grip, rows))
    for row in SHUFFLE_SLIDES:
        add(near, *shuffle(*row))
    for row in FAST_SCRAPES:
        add(near, *fast_scrape(*row))
    return two_ports(near, hits) + birds() + air()


def band_limit(x):
    """A steep low-pass at the top of the band."""
    return signal.sosfilt(signal.butter(12, 16770, fs=SR, output="sos"), x)


def record(dry):
    """Each microphone port adds its own steady hiss, coloured noise."""
    hiss = to_linear_factor(HISS_DB) * evened(colour(rng.standard_normal((2, N)), HISS_COLOUR))
    return band_limit(dry + hiss)


dry = scene()
out = record(dry)
dump(out)
```